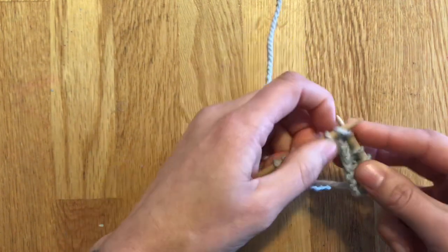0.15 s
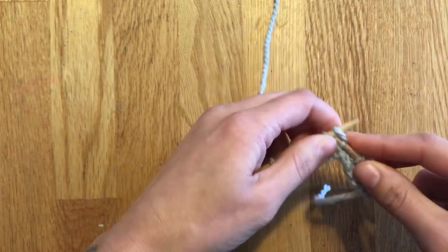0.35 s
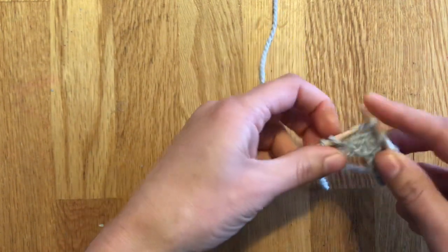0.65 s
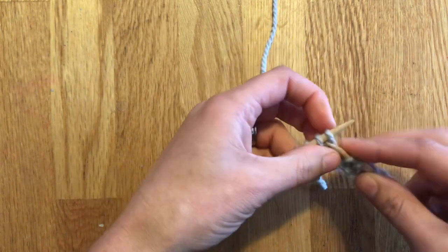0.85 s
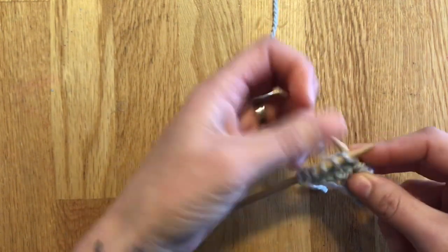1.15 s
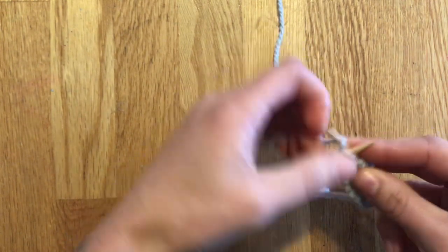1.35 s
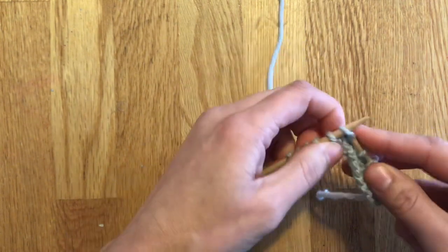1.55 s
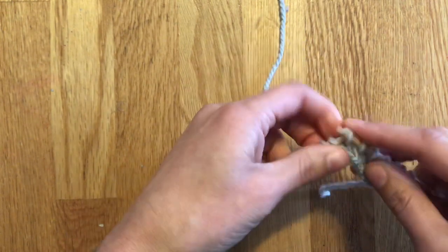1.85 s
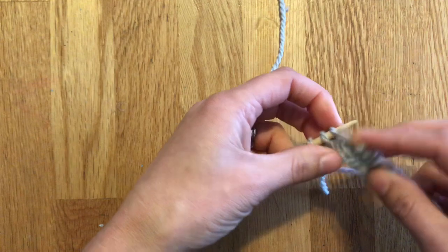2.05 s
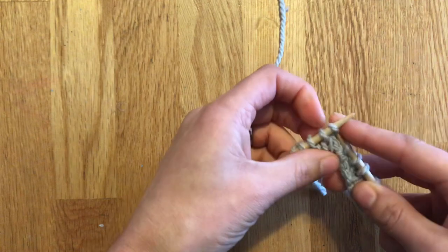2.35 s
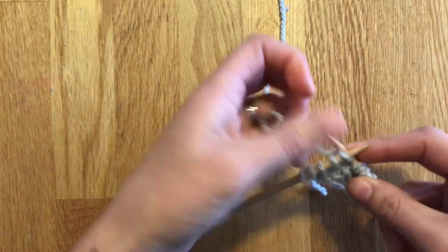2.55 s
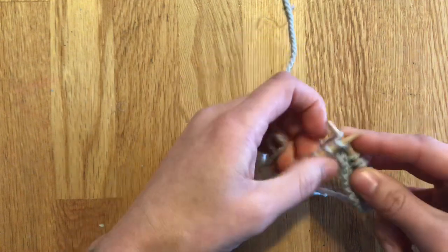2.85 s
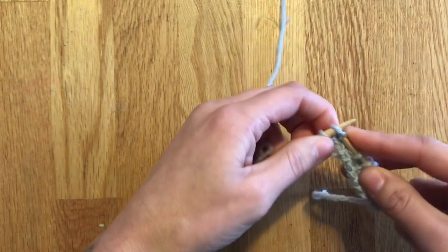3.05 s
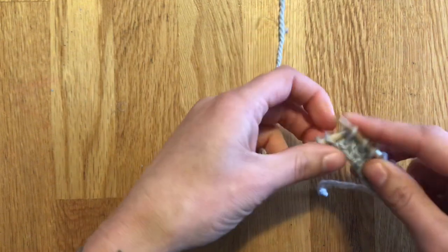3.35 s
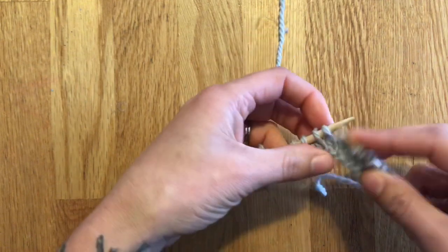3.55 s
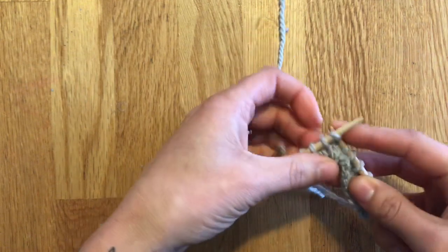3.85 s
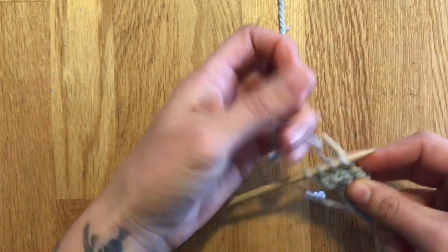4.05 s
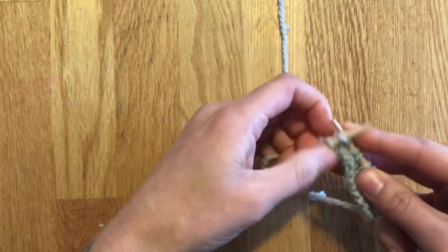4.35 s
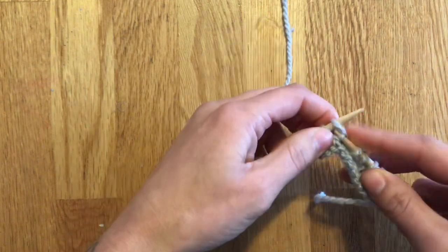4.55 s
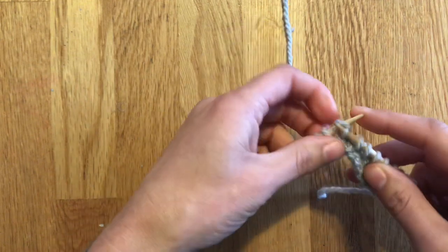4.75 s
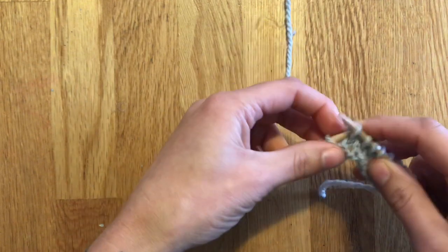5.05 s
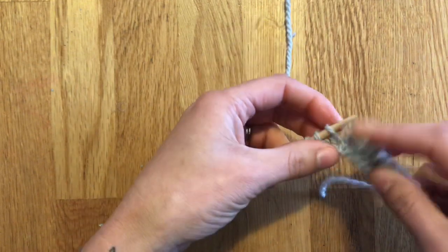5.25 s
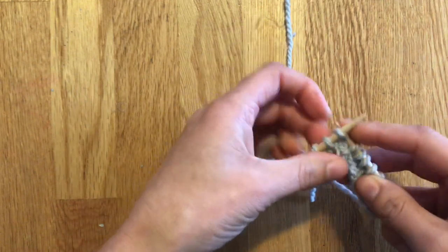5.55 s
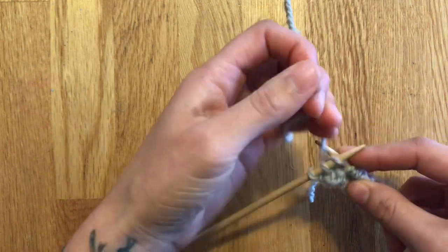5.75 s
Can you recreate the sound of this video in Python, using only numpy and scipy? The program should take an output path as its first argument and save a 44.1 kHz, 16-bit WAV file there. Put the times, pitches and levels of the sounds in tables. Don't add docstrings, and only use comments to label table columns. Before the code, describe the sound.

A quiet indoor room holds a low, steady appliance hum, a wavering far engine drone sinking slightly in pitch, faint fan and pump surges, traffic rumble and soft microphone hiss. Close up, thin wooden knitting needles tick: a light click at 0.25 s, firmer snaps at 0.5 and 0.6, faint ones around 0.9 to 1.1. At about 1.5 a low, dull table bump and tiny drag join a crisp click. More ticks come at 1.8, 2.1 and a stronger one at 2.5; a faint cluster with a short scrape falls near 2.95. A hard snap with a rebound sounds at 3.2, then clicks at 3.6 and 3.8. Brief slides rub around 3.9 to 4.5, a firm click lands at 4.7, a faint one at 4.95. From 5.5 to 5.7, small clicks, a nail tap and the clearest scrapes bunch together, with a faint slide trailing off near 5.8. Yarn rustles softly throughout.

```python
import sys
import numpy as np
from scipy import signal
from scipy.fft import rfft, irfft, next_fast_len
from scipy.io import wavfile
from scipy.ndimage import uniform_filter1d, map_coordinates

SR = 44100
rng = np.random.default_rng(int(sys.argv[2]) if len(sys.argv) > 2 else 0)


def master_out(mix):
    frames = np.transpose(np.atleast_2d(mix))
    ceiling = np.clip(frames, -1, 1)
    pcm = np.round(ceiling * 32767).astype(np.int16)
    wavfile.write(sys.argv[1], SR, pcm)


def voltage_ratio(decibels):
    exponent = np.asarray(decibels, float) / 20
    return 10 ** exponent


N = 260807
RING = 3000
TOP_HZ = 15780

# time in seconds, level in dB.
ENGINE_LEVEL = [(0, -55), (.47, -52), (.62, -68), (.9, -54), (1.35, -50.5), (1.75, -54), (2.05, -61),
                (2.25, -53), (2.56, -62), (2.68, -53), (2.8, -66), (3.1, -52), (3.27, -64), (3.4, -50),
                (3.6, -55), (3.7, -46.5), (4.62, -50), (4.9, -45.5)]
# start in seconds, end in seconds, level in dB, level of its
# octave in dB.
DRONE_SURGES = [(1.4, 1.95, -59, -78), (1.9, 2.55, -52, -62), (2.75, 3.25, -59, -58), (4, 4.35, -57, -80),
                (4.8, 5.2, -56, -78)]
# start in seconds, end in seconds, level in dB.
PUMP_SURGES = [(.15, 1.05, -63), (2.85, 3.65, -59), (3.95, 4.25, -60), (4.8, 5.8, -57)]
# pitch in Hz, level in dB, growth from start to end in dB.
PANEL_LINES = [(90.7, -63, 7), (204.3, -66, 3)]
# pitch in Hz, rms level in dB.
APPLIANCE_HUM = (51.6, -56)
# frequency in Hz, density in dB per Hz.
TRAFFIC_SPECTRUM = [(120, -33), (200, -1), (310, -3), (480, -19), (700, -32), (1200, -90)]
# start in seconds, end in seconds, level in dB.
VEHICLE_PASSES = [(0, .3, -64), (1.35, 1.55, -63), (2.05, 2.5, -63), (2.8, 3.2, -64), (5.3, 5.6, -64)]
# frequency in Hz, density in dB per Hz.
ROOM_SPECTRUM = [(25, -23), (42, -7), (70, -5), (85, -0.5), (150, 0), (210, -5.5), (310, -12.5), (500, -22),
                 (800, -28.5), (1270, -29.5), (1600, -33), (5900, -43), (10200, -46), (14500, -41.5)]

# hardest pull in seconds, level in dB, seconds to gain 10 dB,
# seconds to lose 10 dB, skin share in dB.
YARN_PULLS = [(.242, -67, .25, .09, -8), (.465, -65.5, .16, .09, -8.5), (.62, -60, .04, .14, -1),
              (1.075, -64.5, .13, .035, -2), (1.175, -65.5, .04, .07, 1), (1.511, -66, .15, .14, 1),
              (1.749, -62.5, .027, .04, -7.5), (1.92, -58.5, .022, .075, -2.5), (2.13, -70.5, .17, .28, -3),
              (2.382, -66, .037, .026, -4), (2.56, -64, .061, .06, -3), (2.98, -70, .1, .2, 6),
              (3.2, -62.5, .06, .06, -2.5), (3.38, -63, .05, .16, -4), (3.63, -70, .04, .06, 0),
              (3.9, -61.5, .104, .035, -6.5), (4.0, -65, .04, .07, 1), (4.35, -69, .1, .2, -3),
              (4.744, -66.5, .25, .17, -11), (5.065, -65, .028, .1, -2.5), (5.218, -64, .084, .029, -4),
              (5.34, -65, .027, .042, -7), (5.521, -63, .027, .04, -5), (5.66, -67, .12, .05, 4)]
# frequency in Hz, density in dB per Hz.
FIBRE_SPECTRUM = [(3000, -21), (4200, -3), (4900, -4), (6000, -0.5), (7200, -5), (8300, -5), (10200, -7.5),
                  (11200, -5), (14000, -11)]
# frequency in Hz, density in dB per Hz.
SKIN_SPECTRUM = [(500, -8), (900, 5), (1330, -1), (1700, -0.5), (2500, 0), (3600, 1), (4400, -5),
                 (5500, -15)]

# start in seconds, peak in dB, share of the shaft's low modes in dB,
# share of the tip's high modes in dB, table echo delay in ms.
FIRM_CONTACTS = [(0.2458, -44, -19, -9, .47), (0.498, -35, -13, -2.5, .42), (0.602, -31, -14.5, -9, .39),
                 (0.8983, -50.5, -13, -2, .44), (0.9877, -44, -12.5, -3, .38),
                 (1.0909, -50.5, -8.5, -15, .37), (1.509, -36, -11.5, -0.5, .46),
                 (1.5805, -54, -13, -3, .46), (1.8066, -42.5, -9, 1.5, .43), (2.1227, -44, -16, -1, .4),
                 (2.3794, -53, -4, -5, .36), (2.4819, -36.5, -9.5, 1.5, .4), (2.9113, -52, -15, 2, .36),
                 (2.9417, -48.5, -9, 0, .37), (2.9773, -47, -6, -13, .41), (3.2122, -32, -15, -2, .42),
                 (3.6117, -48, -16, -1.5, .44), (3.786, -41.5, -15, -1.5, .38), (3.9985, -54, 0, 7, .41),
                 (4.3847, -52, -13, -15, .42), (4.6887, -34.5, -13.5, 0, .4), (4.943, -50.5, -9, -12, .4),
                 (5.522, -46, -13, -9, .4), (5.576, -47, -12, -5, .36)]
# start in seconds, peak in dB, share of the tip's high modes in dB.
LIGHT_TOUCHES = [(1.1732, -55, -10), (1.4602, -57, -2), (1.516, -46, -6), (1.7405, -57, 0), (1.894, -58, 2),
                 (2.1903, -66.5, 14.5), (2.5731, -59, -7), (3.2177, -43.5, -13), (3.6234, -52.5, -16),
                 (3.7574, -65.5, 6), (3.9026, -59, 6), (4.4815, -58.5, -7), (5.4171, -59.5, -9),
                 (5.6204, -47.5, -6), (5.658, -60, 9)]
# pitch in Hz, level in dB, t60 in seconds.
SHAFT_MODES = [(992, -8, 0.057), (1104, -7.5, 0.022), (1290, 0, 0.017), (1900, 1, 0.011),
               (2140, -0.5, 0.0057), (2582, 0, 0.029)]
MIDDLE_MODES = [(3120, -2.3, 0.011), (3530, 0.16, 0.0066), (4030, -2.4, 0.014), (4390, -1.4, 0.012)]
MAIN_MODES = [(5350, -2, .005), (5750, -4, .006), (6150, -1, .007), (6600, -1, .005)]
TIP_MODES = [(8120, -0.5, 0.0058), (8750, -0.5, 0.0033), (10100, -1, 0.0016), (11010, -4.5, 0.005),
             (12600, 1, 0.0017), (14240, -8.5, 0.0064), (15100, -15, 0.002)]
# frequency in Hz, t60 in seconds.
ROOM_DECAY = [(500, 0.13), (3000, 0.067), (12000, 0.084)]

# start in seconds, end in seconds, level in dB,
# brightening per mode group in dB, shaft modes over the level in dB.
NEEDLE_SLIDES = [(1.074, 1.097, -75, -5, 6), (1.142, 1.172, -78, -5, 9), (1.268, 1.345, -88, 11, 11),
                 (2.543, 2.56, -76, 0, -9), (2.791, 2.879, -82, 9, -1), (2.971, 2.987, -62, -1, 0),
                 (3.022, 3.045, -73, -3, -11), (3.866, 3.893, -76, 2.5, 6), (3.897, 3.925, -67, -2, 0),
                 (3.975, 4.009, -65.5, 3, -3), (4.363, 4.4, -63.5, -4, -6), (4.462, 4.494, -76, 6, -6),
                 (5.582, 5.631, -59.5, 1, -12), (5.653, 5.707, -62.5, 2, -1), (5.79, 5.867, -78, 6, 2)]
# pitch in Hz, level in dB, t60 in seconds.
SLIDE_MODES = [
    [(990, 9.5, 0.011), (1330, 6, 0.012), (2380, 7, 0.009)],
    [(3600, -2, 0.011), (4010, -6, 0.016)],
    [(4880, -3, 0.01), (5690, 6, 0.008)],
    [(8080, -8, .006), (10860, -3.5, 0.004), (12800, -7, 0.003), (13600, -8, 0.004)],
]
# start in seconds, peak in dB.
TABLE_BUMPS = [(1.4728, -38)]
# pitch in Hz, level in dB, t60 in seconds.
TABLE_MODES = [(209.4, 10.5, 0.081), (448.6, -4, 0.047), (653, -1, 0.036), (2200, -1, 0.012)]
# start in seconds, end in seconds, level in dB.
TABLE_DRAG = (1.479, 1.506, -59.5)
# pitch in Hz, level in dB, t60 in seconds.
TABLE_DRAG_MODES = [(2310, 0, .012), (2750, -5, .008), (3230, -1, .012)]
# (pitch in Hz, level in dB, t60 in seconds).
NAIL_TAP = (5.5487, -51, [(1600, -4, .008), (2050, 0, .012), (2500, -5, .008)])


def unit(x):
    return x / np.sqrt(np.mean(x ** 2) + 1e-20)


def along(points, hz):
    f, v = np.transpose(points)
    return np.interp(np.log(hz + 1), np.log(f + 1), v)


def wobble(rate):
    knots = rng.standard_normal(int(N / SR * 60) + 4)
    return map_coordinates(knots, [np.arange(N) * min(rate, 60) / SR])


def stroke(start, end):
    progress = np.clip((np.arange(N) / SR - start) / (end - start), 0, 1)
    return np.sin(np.pi * progress) ** 0.56


def surges(rows):
    return voltage_ratio(np.transpose(rows)[2:]) @ np.array([stroke(*row[:2]) for row in rows])


def noise(spectrum, patchy_db):
    z = signal.stft(rng.standard_normal(N), nperseg=512)[2]
    field = uniform_filter1d(rng.standard_normal(z.shape), 9, 0)
    field = uniform_filter1d(field, 9, 1)
    patchy = signal.istft(z * voltage_ratio(patchy_db * unit(field)), nperseg=512)[1][:N]
    m = next_fast_len(N + 8192)
    hz = np.fft.rfftfreq(m, 1 / SR)
    gain = voltage_ratio(along(spectrum, hz) - 40 * np.clip((hz - TOP_HZ) / 350, 0, 2))
    return unit(irfft(rfft(patchy, m) * gain, m)[:N])


def ring(modes, scatter_db=0, detune=0):
    hz, db, t60 = np.transpose(modes)[:, :, None]
    t = np.arange(RING) / SR
    strength, pitch = rng.standard_normal((2, len(modes), 1))
    sign = (-1) ** np.arange(len(modes))[:, None]
    waves = sign * np.sin(2 * np.pi * hz * (1 + detune * pitch) * t)
    x = np.sum(voltage_ratio(db + scatter_db * strength - 60 * t / t60) * waves, axis=0)
    x *= 1 - np.exp(-t / .00008)
    return x / np.abs(x).max()


def tone(hz, db, unsteady_db, rate):
    phase = 2 * np.pi * np.cumsum(hz + np.zeros(N)) / SR + 0.11 * unsteady_db * wobble(rate)
    return np.sqrt(2) * voltage_ratio(db + unsteady_db * wobble(rate)) * np.sin(phase)


def engine():
    t = np.arange(N) / SR
    level_db = np.interp(t, *np.transpose(ENGINE_LEVEL))
    return tone(121 - 1.3 * t, level_db, 2.2, 16)


def far_drone():
    hz = 140.5 - 1.25 * np.arange(N) / SR
    first, octave = surges(DRONE_SURGES)
    return (first + voltage_ratio(-72)) * tone(hz, 0, 0.5, 19) + octave * tone(2 * hz, 0, 0.5, 11)


def pump():
    t = np.arange(N) / SR
    out = (surges(PUMP_SURGES)[0] + voltage_ratio(-76)) * tone(154.8 - .85 * t, 0, 0.5, 10)
    for hz, db, growth_db in PANEL_LINES:
        out += tone(hz, db + growth_db * (t / t[-1] - .5), 3.5, 6)
    return out


def hum():
    progress = np.arange(N) / (N - 1)
    return voltage_ratio(3 * (progress - .5) + .7) * tone(*APPLIANCE_HUM, 0.37, 8.4)


def traffic():
    level = voltage_ratio(-66 + 3 * wobble(5)) + surges(VEHICLE_PASSES)[0]
    return level * noise(TRAFFIC_SPECTRUM, patchy_db=4.0)


def room_air():
    return voltage_ratio(-52.5) * noise(ROOM_SPECTRUM, patchy_db=1.88)


def rustle():
    s, db, rise_s, fall_s, skin_db = np.transpose(YARN_PULLS)[:, :, None]
    coarse = np.arange(0, N + 64, 64)
    since = coarse / SR - s
    pull = voltage_ratio(db - 10 * np.maximum(-since / rise_s, since / fall_s))
    on_wood = np.interp(np.arange(N), coarse, np.linalg.norm(pull, axis=0))
    on_skin = np.interp(np.arange(N), coarse, np.linalg.norm(pull * voltage_ratio(skin_db), axis=0))
    flutter = voltage_ratio(-2 + 1.5 * wobble(50))
    fibres = on_wood * noise(FIBRE_SPECTRUM, patchy_db=1.8)
    skin = on_skin * noise(SKIN_SPECTRUM, patchy_db=1.5)
    return flutter * (fibres + skin)


def crack():
    snap = np.diff(rng.standard_normal(RING + 1)) * voltage_ratio(-60 * np.arange(RING) / SR / .004)
    return snap / np.abs(snap).max()


def push():
    u = np.arange(RING) / SR / .00012
    return (1 - u) * np.exp(-u) * (1 - np.exp(-4 * u)) / .4


def off_table(x, lag_ms):
    hz = np.fft.rfftfreq(len(x), 1 / SR)
    path = np.ones(len(hz), complex)
    for gain, lags in [(-.7, 1), (.3, 2.6), (-.15, 4.4)]:
        path += gain * np.exp(-2j * np.pi * hz * lags * lag_ms / 1000)
    return irfft(rfft(x) * path, len(x))


def clicks():
    out = np.zeros(N)
    touches = [(s, db, -7, tip_db, .4) for s, db, tip_db in LIGHT_TOUCHES]
    for s, db, shaft_db, tip_db, lag_ms in list(FIRM_CONTACTS) + touches:
        middle_db = -8 - .4 * (db + 47)
        x = ring(MAIN_MODES, 1.14, 0.029) + voltage_ratio(-6) * push()
        x += voltage_ratio(middle_db + 5.5) * ring(MIDDLE_MODES, 1.1, 0.024)
        x += voltage_ratio(tip_db + 4) * (ring(TIP_MODES, 1.5, .015) + .5 * crack())
        x = off_table(x, lag_ms) + voltage_ratio(shaft_db + 5.5) * ring(SHAFT_MODES, 3, 0.04)
        out[round((s + .0008) * SR):][:RING] += voltage_ratio(db - 3.5) * x
    return out


def grain_slips():
    slips = (rng.random(N) < 3000 / SR) * rng.standard_normal(N) * voltage_ratio(1.5 * rng.exponential(size=N))
    slips = (slips + .1 * rng.standard_normal(N)) * voltage_ratio(3 * wobble(60))
    return slips / np.sqrt(np.abs(uniform_filter1d(slips ** 2, 1300)) + 1e-9)


def rubbed(slips, modes):
    return unit(signal.fftconvolve(slips, ring(modes))[:N])


def scrapes():
    slips = grain_slips()
    pressure = np.array([stroke(*row[:2]) for row in NEEDLE_SLIDES])
    db, tilt_db, shaft_db = np.transpose(NEEDLE_SLIDES)[2:]
    levels = [db + shaft_db, db - tilt_db - 1.5, db, db + tilt_db - 1.5]
    out = np.zeros(N)
    for modes, group_db in zip(SLIDE_MODES, levels):
        out += (voltage_ratio(group_db) @ pressure) * rubbed(slips, modes)
    return out


def table_bumps():
    out = np.zeros(N)
    for s, db in TABLE_BUMPS:
        out[round(s * SR):][:RING] += voltage_ratio(db - 1.0) * ring(TABLE_MODES)
    return out


def table_drag():
    start, end, db = TABLE_DRAG
    return stroke(start, end) * voltage_ratio(db) * rubbed(grain_slips(), TABLE_DRAG_MODES)


def nail_tap():
    s, db, modes = NAIL_TAP
    out = np.zeros(N)
    out[round(s * SR):][:RING] += voltage_ratio(db) * ring(modes)
    return out


def room(x):
    hz, t, z = signal.stft(rng.standard_normal(SR // 3), SR, nperseg=256)
    decay = voltage_ratio(-60 * t / along(ROOM_DECAY, hz)[:, None])
    in_band = (hz < TOP_HZ - 400)[:, None]
    tail = signal.istft(z * decay * in_band, SR, nperseg=256)[1]
    late = np.pad(x, (130, 0))
    return signal.fftconvolve(late, tail / np.linalg.norm(tail))[:N]


def scene():
    machines = engine() + far_drone() + pump() + hum()
    far = machines + traffic() + room_air()
    near = clicks() + scrapes() + table_bumps() + table_drag() + nail_tap()
    return (far + rustle() + near + voltage_ratio(-17) * room(near))[None]


def top_cut(x):
    return signal.sosfilt(signal.butter(12, 16760, fs=SR, output="sos"), x)


def record(dry):
    m = next_fast_len(N)
    hz = np.fft.rfftfreq(m, 1 / SR)
    shelf = voltage_ratio(-12 * np.clip((hz - TOP_HZ) / 600, 0, 1))
    edge = shelf * np.clip((16800 - hz) / 400, 0, 1)
    heard = irfft(rfft(dry, m) * edge, m)[:, :N]
    return top_cut(heard)


dry = scene()
out = record(dry)
master_out(out)
```